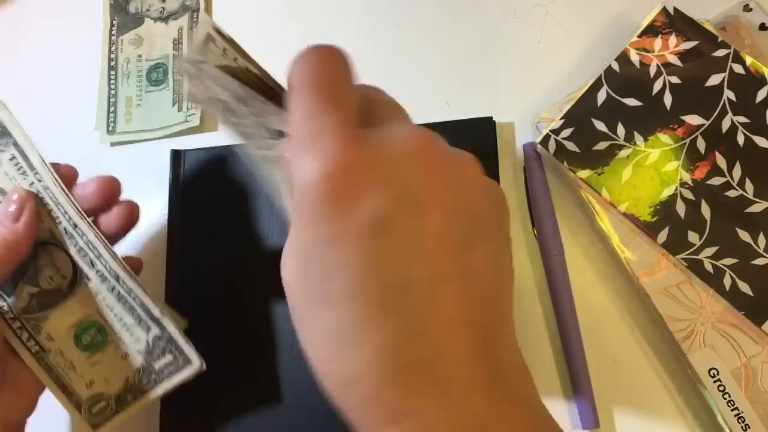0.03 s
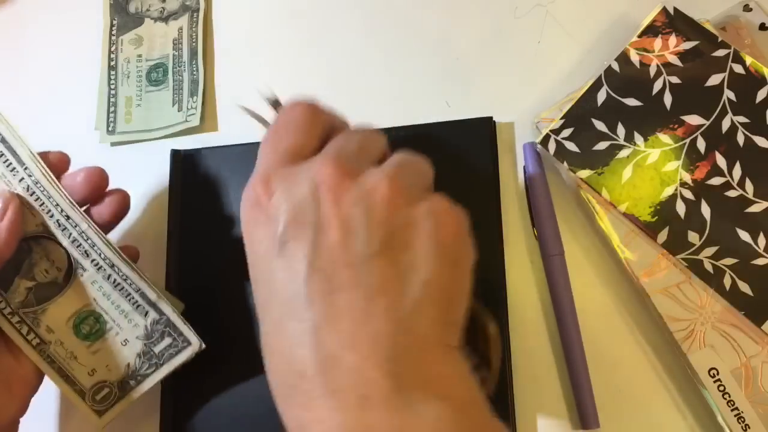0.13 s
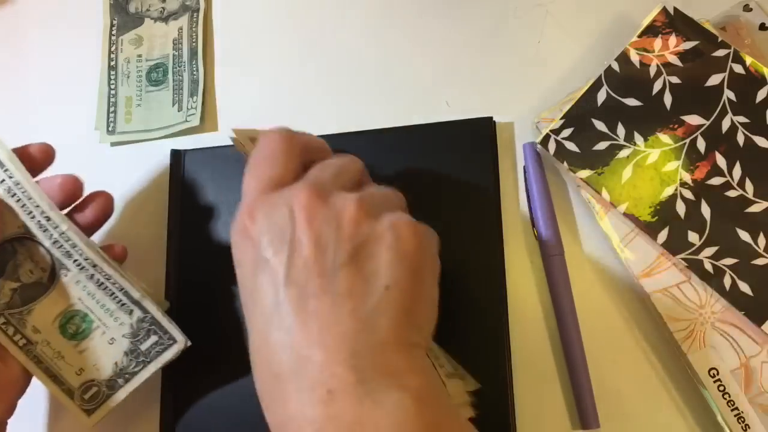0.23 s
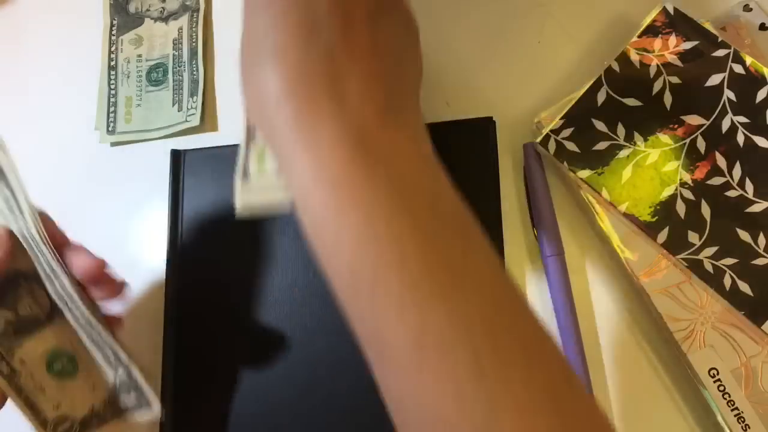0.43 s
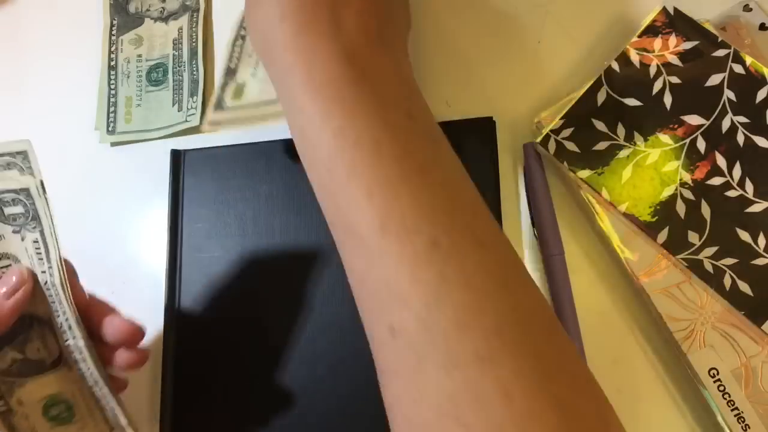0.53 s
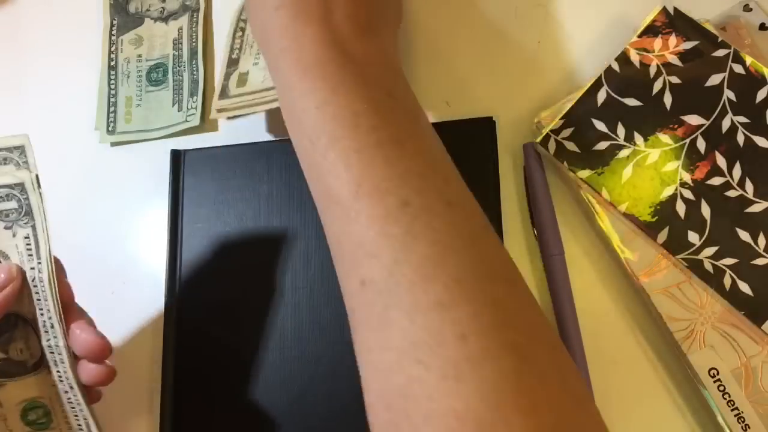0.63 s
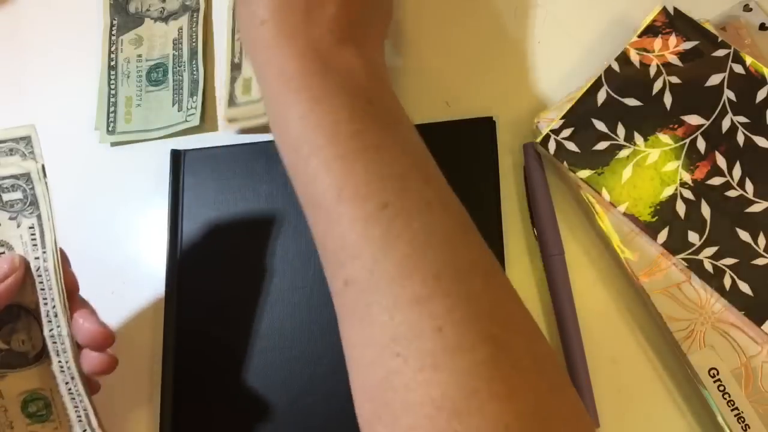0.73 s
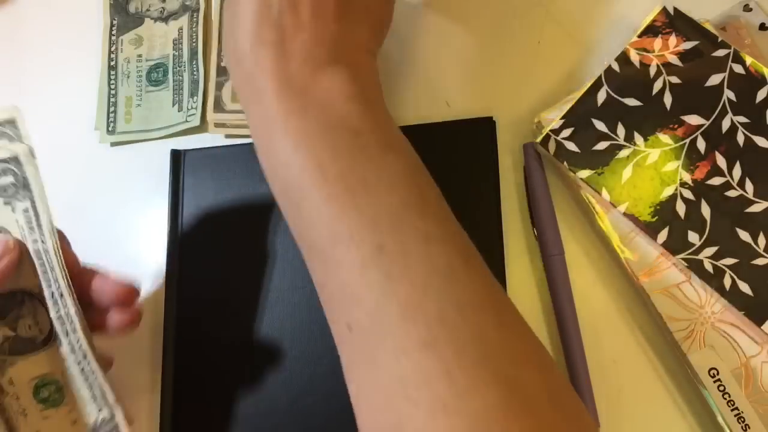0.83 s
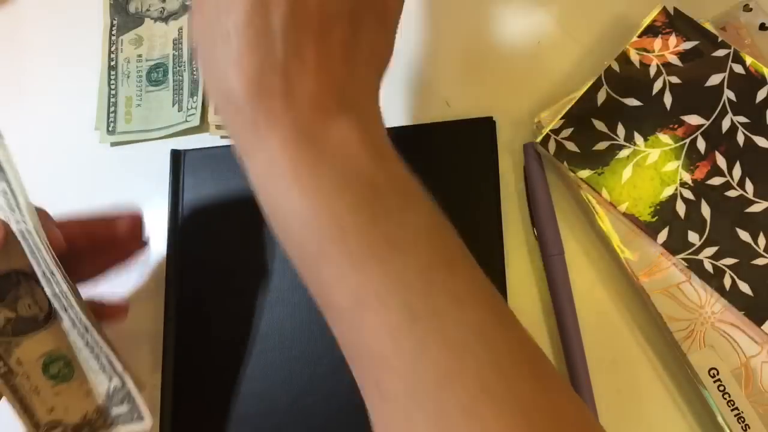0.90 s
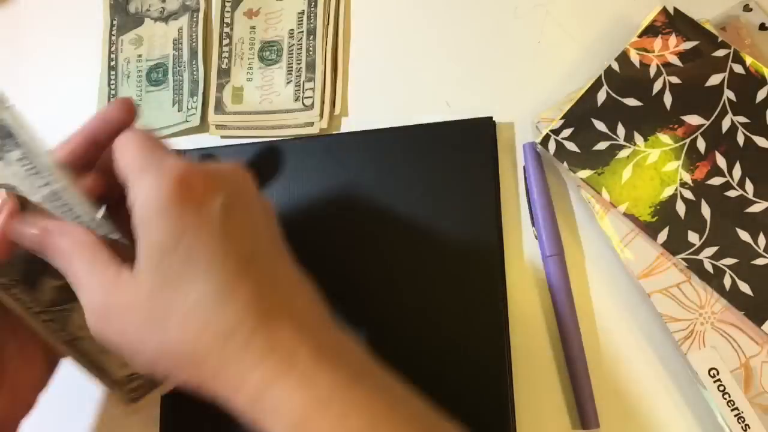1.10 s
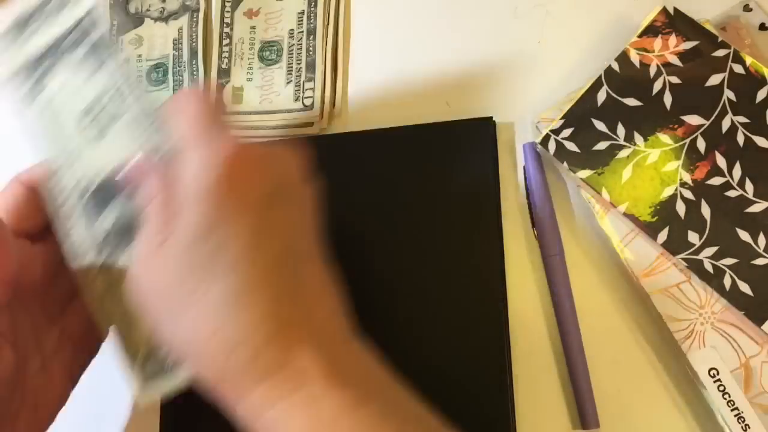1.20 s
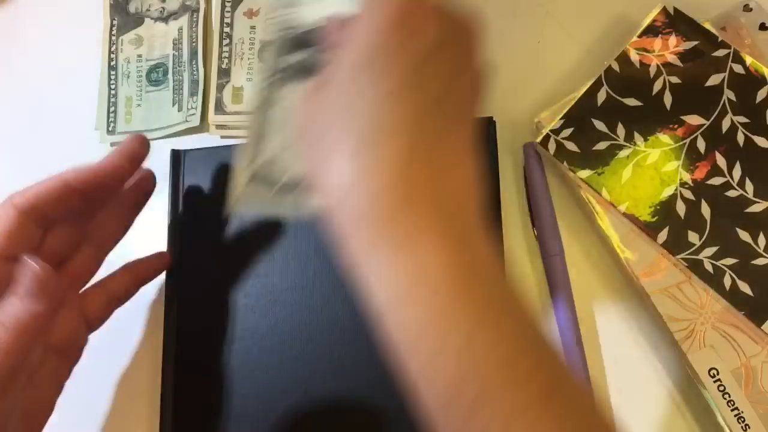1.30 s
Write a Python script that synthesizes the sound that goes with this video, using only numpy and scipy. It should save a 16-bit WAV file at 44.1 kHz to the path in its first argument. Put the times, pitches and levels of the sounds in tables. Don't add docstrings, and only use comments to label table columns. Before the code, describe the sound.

A bright, crackling flick of paper notes comes early, followed by small ticks, dull finger pats on the stack and light sliding whispers, heard closely in a small quiet room with a faint low rumble.

```python
import sys
import numpy as np
from scipy import signal
from scipy.fft import rfft, irfft, next_fast_len
from scipy.io import wavfile
from scipy.ndimage import uniform_filter1d

SR = 44100
rng = np.random.default_rng(int(sys.argv[2]) if len(sys.argv) > 2 else 0)


def rack_gain(trim_db):
    fader = np.asarray(trim_db, float)
    return 10 ** (fader / 20)


def unload_wav(signal):
    wavfile.write(
        sys.argv[1],
        SR,
        np.round(np.clip(np.atleast_2d(signal).T, -1, 1) * 32767).astype(np.int16),
    )


N = 59535


def shaped(x, points):
    size = next_fast_len(x.shape[-1] + 4096)
    hz, db = np.transpose(points)
    bins_hz = np.arange(size // 2 + 1) * SR / size
    gain = rack_gain(np.interp(np.log(bins_hz + 1), np.log(hz), db, left=-80, right=-80))
    cepstrum = irfft(np.log(gain), size)
    cepstrum[1:size // 2] *= 2
    cepstrum[size // 2 + 1:] = 0
    response = np.exp(rfft(cepstrum))
    y = irfft(rfft(x, size) * response, size)[..., :x.shape[-1]]
    return y / np.sqrt(np.mean(gain ** 2))


def resonance(x, hz, width_hz):
    r = np.exp(-np.pi * width_hz / SR)
    poles = [1, -2 * r * np.cos(2 * np.pi * hz / SR), r * r]
    return signal.lfilter([(1 - r * r) / 2, 0, (r * r - 1) / 2], poles, x)


def narrow_noise(hz, width_hz, db):
    x = resonance(rng.standard_normal(N + SR), hz, width_hz)[SR:]
    return rack_gain(db) * x / x.std()


# frequency in Hz, level in dB.
RUMBLE_SPECTRUM = [(13, -69.5), (22, -16.5), (48, 3.5), (92, -1), (108, 0), (160, 0), (181, 0),
                   (216, -10.5), (260, -30.5), (340, -90), (570, -120)]


def appliance_rumble():
    return rack_gain(-49) * shaped(rng.standard_normal(N + SR), RUMBLE_SPECTRUM)[SR:]


# frequency in Hz, level in dB.
AIR_SPECTRUM = [(130, -56), (220, -11.5), (332, -12), (370, -11), (681, -21.5), (1420, -24), (1830, -25),
                (2220, -51), (16000, -35)]
# frequency in Hz, bandwidth in Hz, level in dB.
FAN_WHISTLES = [(660, 31, -73), (1890, 380, -74)]


def air_noise():
    air = rack_gain(-68) * shaped(rng.standard_normal(N + SR), AIR_SPECTRUM)[SR:]
    return air + sum(narrow_noise(*row) for row in FAN_WHISTLES)


def room_tone():
    hum = narrow_noise(hz=118.1, width_hz=1.7, db=-52.5)
    return appliance_rumble() + air_noise() + hum


def room_tail(x):
    t60_s, level_db, wall_cut_hz = 0.24, -22.5, 1300
    t = np.arange(SR // 2) / SR
    tail = rng.standard_normal(len(t)) * rack_gain(-60 * t / t60_s) * (t > .004)
    tail = signal.lfilter([1], [1, -np.exp(-2 * np.pi * wall_cut_hz / SR)], tail)
    return rack_gain(level_db) * signal.fftconvolve(x, tail / np.sqrt(np.sum(tail ** 2)))[:N]


# frequency in Hz, level in dB.
SHEET_BODY = [(250, -3), (600, -12.5), (1000, -2), (1900, -6.5), (2500, -1.5), (4200, -7.5), (6500, -11),
              (9000, -30)]


def sheet_body(x):
    return shaped(x, SHEET_BODY)


# frequency in Hz, level in dB.
SHEET_TREBLE = [(2650, -15), (4500, -5), (6000, -4.5), (8500, -0.5), (10000, -4.5), (12000, -5.5),
                (15500, -8), (21000, -7)]


def sheet_treble(x):
    return shaped(x, SHEET_TREBLE)


def grains(shape):
    per_s, spread_db = 15000, 2
    happens = rng.random(shape) < per_s / SR
    strength = rack_gain(spread_db * np.minimum(rng.exponential(1, shape), 5))
    x = happens * strength * rng.choice([-1, 1], shape)
    return x / x.std()


def crackles():
    per_s, cycles = 900, 10
    happens = rng.random(N) < per_s / SR
    clicks = happens * rack_gain(4.0 * np.minimum(rng.exponential(1, N), 3)) * rng.choice([-1, 1], N)
    dealt = rng.integers(0, 16, N)
    x = np.zeros(N)
    for k, hz in enumerate(np.geomspace(1000, 9000, 16)):
        x += resonance(clicks * (dealt == k) + 1e-18, hz, 0.73 * hz / cycles) / np.sqrt(hz)
    return x / x.std()


# time in seconds, level in dB, treble in dB relative to the level.
HAND_MOVES = [(0, -62.5, -3.5), (.08, -64.5, -3), (.11, -72.5, -0.5), (.18, -71, -7), (.31, -61, -7),
              (.37, -64, -2), (.44, -58, -6), (.52, -73, 3.5), (.55, -69, -5.5), (.63, -67.5, -10),
              (.66, -62.5, -4), (.77, -62, -9), (.87, -70, -6.5), (.9, -77.5, -3), (1.129, -74, -6),
              (1.164, -67, -0.5), (1.27, -68, 1), (1.35, -63.5, -11)]


def handling_envelopes():
    t = np.arange(N) / SR
    s, db, treble_db = np.transpose(HAND_MOVES)
    return rack_gain(np.interp(t, s, db)), rack_gain(np.interp(t, s, db + treble_db))


# start in seconds, length in seconds, level in dB, treble in dB,
# ring of the cupped sheet in Hz.
SHEET_SLIDES = [(0.0, 0.01, -72, -3, 2540), (0.054, .11, -72.5, -20, 2310),
                (0.187, 0.036, -50.5, 1.5, 2440), (0.208, .017, -39, -14, 1390),
                (0.24, 0.024, -42, -3.5, 1055), (.262, 0.025, -51.5, 0, 1000),
                (0.286, .013, -55, 6.5, 5960), (0.463, 0.0075, -64.5, 1.5, 2870),
                (0.5615, 0.0071, -57, -2, 1960), (0.495, 0.016, -64, -19, 2000),
                (0.788, 0.01, -71.5, 3.5, 2500), (.83, .05, -73, 5, 6830), (0.844, .02, -63.5, -13, 2324),
                (1.167, 0.0282, -62.5, 3, 1480), (1.201, 0.038, -58.5, 0.5, 1520),
                (1.224, 0.018, -57.5, -2.5, 2020), (1.291, .04, -68, -7, 1120), (1.327, .03, -58, -3, 2790)]


def slide_envelopes(friction):
    attack_s, t60_s, cup_width = .002, .022, 0.067
    t = np.arange(N) / SR
    body, top, cups = np.zeros((3, N))
    for start, length, level_db, treble_db, hz in SHEET_SLIDES:
        swell = np.clip((t - start) / attack_s, 0, 1)
        release_db = -60 * np.maximum(t - start - length, 0) / t60_s
        shape = swell * rack_gain(level_db + release_db)
        body += shape
        top += shape * rack_gain(treble_db)
        cups += resonance(friction * shape + 1e-18, hz, cup_width * hz) * np.sqrt(SR / hz)
    return body, top, cups


def rustle():
    crackle_db, flutter_db, flutter_samples = -9.5, 0.73, 150
    wander = uniform_filter1d(rng.standard_normal((2, N)), size=flutter_samples) * np.sqrt(flutter_samples)
    low, high = grains((2, N)) * rack_gain(flutter_db * wander)
    hand_body, hand_top = handling_envelopes()
    slide_body, slide_top, cups = slide_envelopes(low)
    body, top = hand_body + slide_body, hand_top + slide_top
    paper = sheet_body(low * body) + sheet_treble(high * top)
    return paper + cups + rack_gain(crackle_db) * body * crackles()


# frequency in Hz, level in dB, decay t60 in seconds.
DESK_MODES = [(165.8, -39, 0.083), (275, -11, 0.067), (571, 2, 0.018), (678, -20.5, .05)]


def desk_ring(knocks):
    out = np.zeros(len(knocks))
    for hz, db, t60 in DESK_MODES:
        r, w = rack_gain(-60 / (t60 * SR)), 2 * np.pi * hz / SR
        out += signal.lfilter([0, rack_gain(db) * np.sin(w)], [1, -2 * r * np.cos(w), r * r], knocks + 1e-18)
    return out


# multiple of the pitch, level in dB.
SHEET_OVERTONES = [(1.0, 2.5), (1.95, -1), (2.85, -5)]


def sheet_rings(push, hz, treble_db):
    width, follows = 0.14, 0.23
    rings = np.zeros(len(push))
    for k, (multiple, db) in enumerate(SHEET_OVERTONES):
        mode = resonance(push, multiple * hz, width * hz * np.sqrt(multiple))
        rings += rack_gain(db + k * follows * treble_db) * (-1) ** k * mode
    return rings


def peak_one(x):
    return x / np.abs(x).max()


def blows(rows, desk_db, crack_db):
    length, crack_at_s, crack_follows = 2500, .0003, .36
    ring_db, treble_decay_share = 8, .6
    t = np.arange(length) / SR
    peak_db, t60_s = np.array(rows)[:, 1:2], np.array(rows)[:, 3:4]
    crackle = grains((len(rows), length)) * np.minimum(t / crack_at_s, 1)
    crack = np.exp(-.5 * ((t - crack_at_s) * SR) ** 2)
    burst = crackle + rack_gain(crack_db + crack_follows * peak_db) * crack
    fall_db = -60 * t / np.clip(t60_s, .003, .1)
    pushes = burst * rack_gain(fall_db)
    bodies = sheet_body(pushes)
    tops = sheet_treble(burst * rack_gain(fall_db / treble_decay_share))
    out, knocks = np.zeros((2, N + SR))
    for (s, db, hz, _, treble_db), body, top, push in zip(rows, bodies, tops, pushes):
        i = int(s * SR)
        rings = sheet_rings(push, hz, treble_db)
        body = peak_one(body) + rack_gain(ring_db) * peak_one(rings)
        out[i:i + length] += rack_gain(db) * (peak_one(body) + rack_gain(treble_db) * peak_one(top))
        knocks[i:i + 60] += rack_gain(db + desk_db) * np.hanning(60) / 10
    return (out + desk_ring(knocks))[:N]


# time in seconds, peak in dB, sheet ring in Hz, decay t60 in seconds, treble in dB.
FINGER_PATS = [(.399, -47.5, 2130, 0.032, -7), (.6445, -43, 2260, 0.017, -8), (.663, -51, 2400, 0.036, -12),
               (.667, -47, 2600, 0.017, -15), (.6891, -26.5, 1343, 0.03, -31),
               (.7262, -37.5, 2050, 0.022, -20), (.7518, -43.5, 1016, 0.083, -16),
               (.799, -37, 1340, 0.021, -18), (.830, -35.5, 1340, .03, -9.5), (.866, -49, 3545, .02, -17.5),
               (1.181, -40, 593, 0.037, -16), (1.227, -44, 2110, 0.035, -12),
               (1.230, -33.5, 1120, 0.064, -17), (1.238, -45, 587, 0.02, -20)]


def finger_pats():
    return blows(FINGER_PATS, desk_db=-16, crack_db=20)


# time in seconds, peak in dB, sheet ring in Hz, decay t60 in seconds, treble in dB.
CREASE_SNAPS = [(.1890, -24.5, 1460, 0.01, -12), (.2050, -23, 1870, 0.019, -3),
                (.2130, -27.5, 1510, 0.12, -6), (.2214, -7.5, 1354, 0.012, -7),
                (.2226, -6, 2410, 0.018, -11.5), (.2246, -12, 1034, 0.06, -8),
                (.2402, -12.5, 1280, 0.032, -7), (.2409, -8.5, 2950, .01, -14),
                (.254, -25, 2500, 0.025, -11), (.4725, -73.5, 2950, 0.034, 4.5),
                (.4915, -65, 3000, 0.0068, 18), (.4988, -35, 2010, 0.039, 3), (.514, -50, 2380, 0.055, -5),
                (.5708, -35.5, 1970, 0.038, -41), (.5814, -36.5, 2250, 0.021, 1.5),
                (1.1722, -31, 1480, 0.024, -2.5), (1.3345, -36, 1670, 0.047, -2)]


def crease_snaps():
    return blows(CREASE_SNAPS, desk_db=-20.5, crack_db=23.5)


def scene():
    paper = rustle() + finger_pats() + crease_snaps()
    paper = signal.sosfilt(signal.butter(2, 146, "high", fs=SR, output="sos"), paper)
    return (room_tone() + room_tail(paper) + paper)[None]


def low_pass(x):
    return signal.sosfilt(signal.butter(12, 16480, fs=SR, output="sos"), x)


def record(dry):
    echo_s, echo_share = .0004, -0.043
    n = np.arange(N)
    x = dry + echo_share * np.interp(n - echo_s * SR, n, dry[0])
    x = signal.sosfilt(signal.butter(2, 35, "high", fs=SR, output="sos"), x)
    x = signal.sosfiltfilt(signal.cheby2(6, 12, 16000, fs=SR, output="sos"), x)
    return low_pass(x)


dry = scene()
out = record(dry)
unload_wav(out)
```